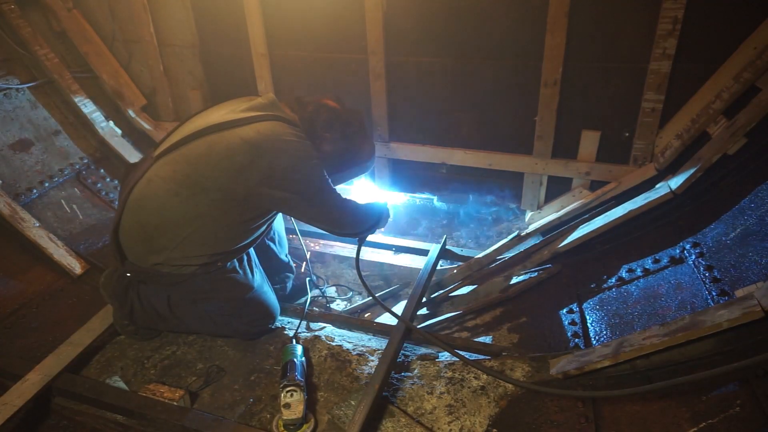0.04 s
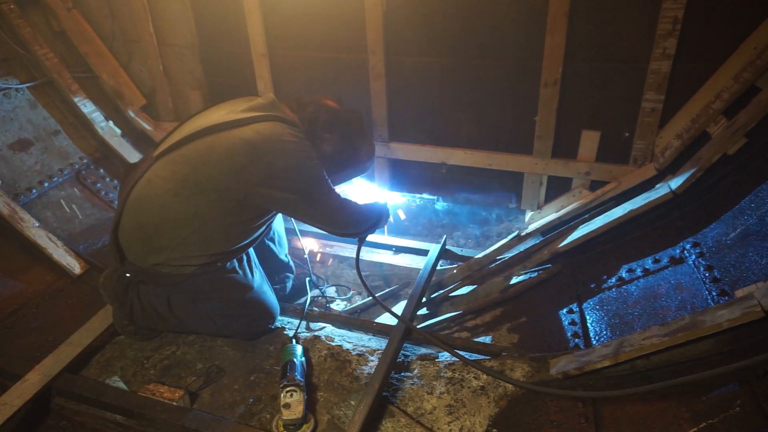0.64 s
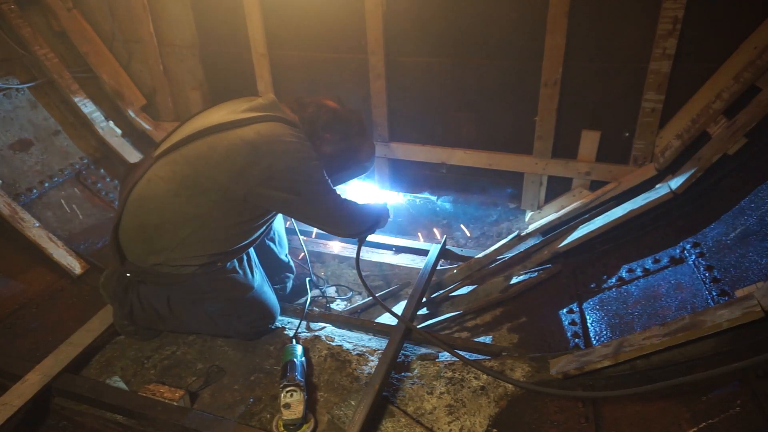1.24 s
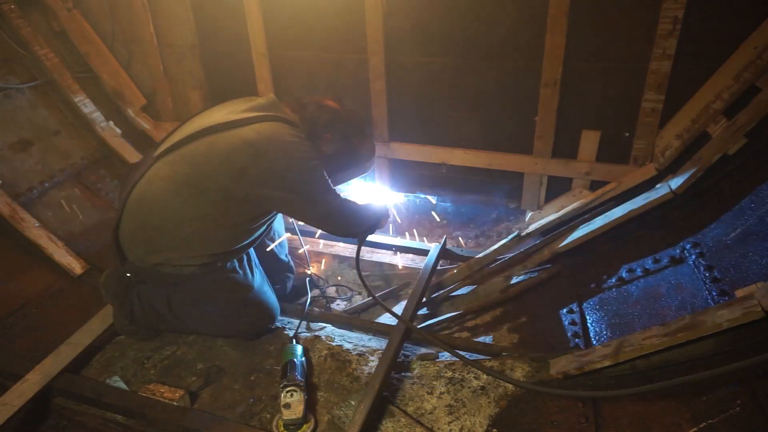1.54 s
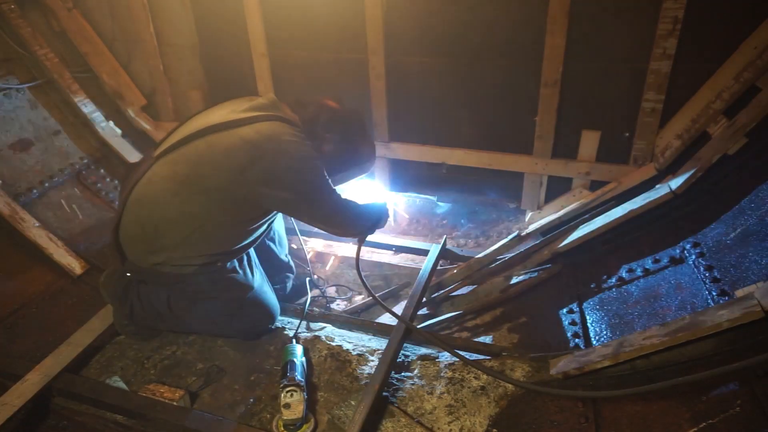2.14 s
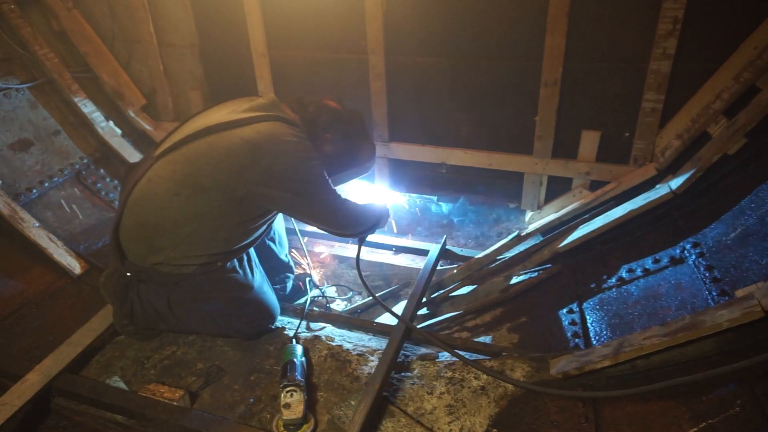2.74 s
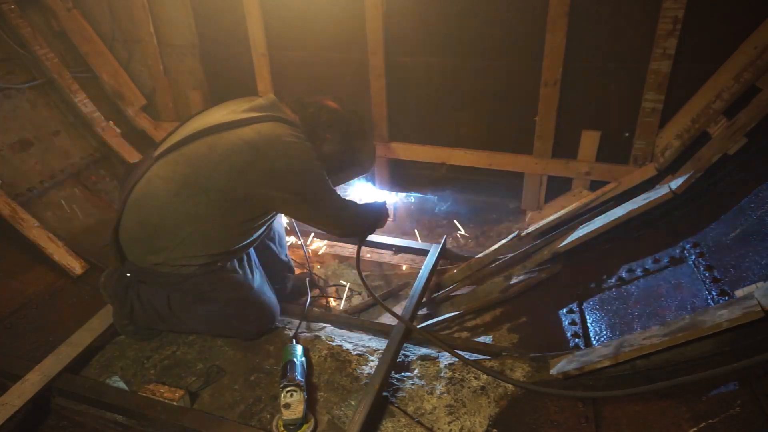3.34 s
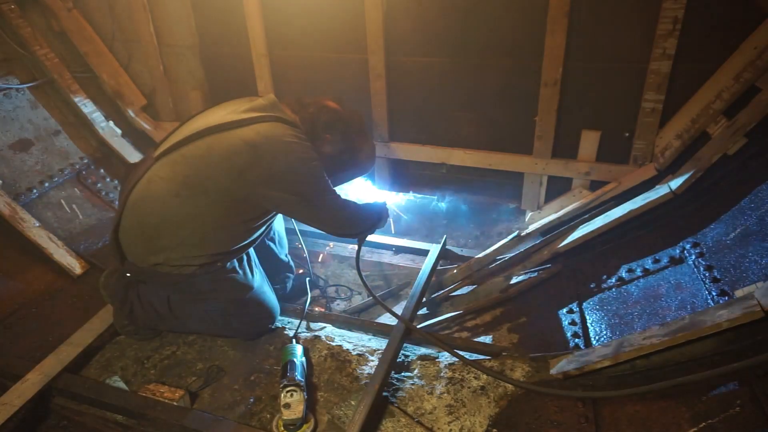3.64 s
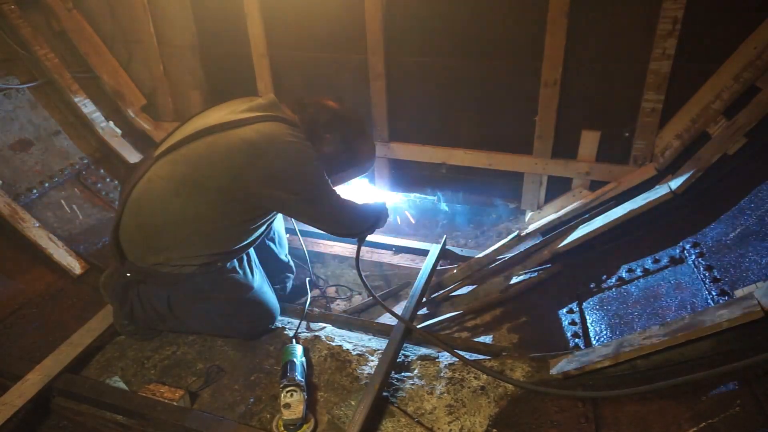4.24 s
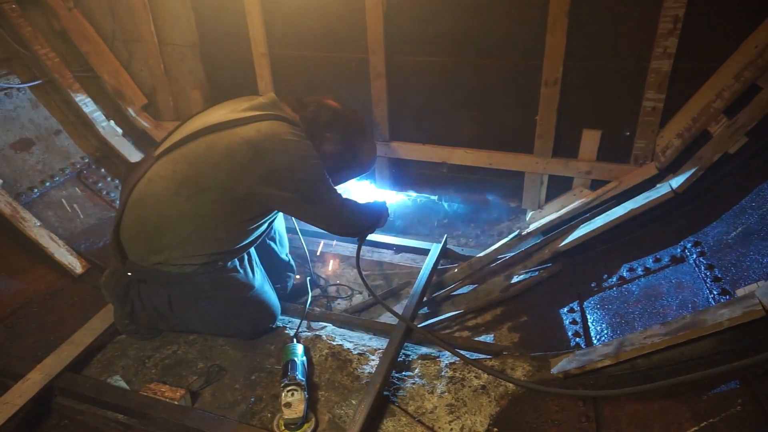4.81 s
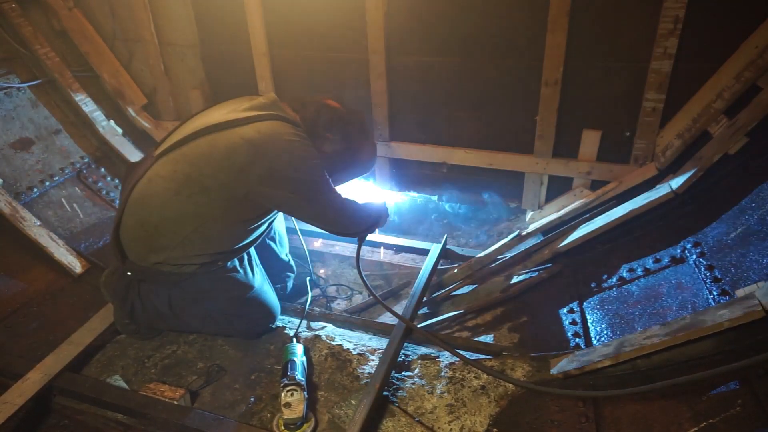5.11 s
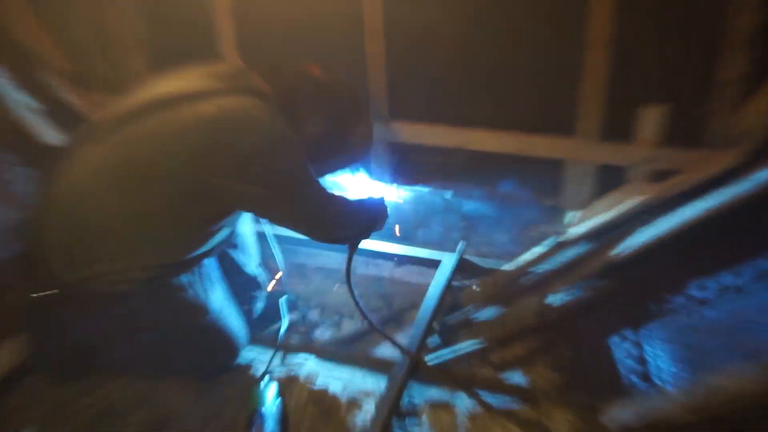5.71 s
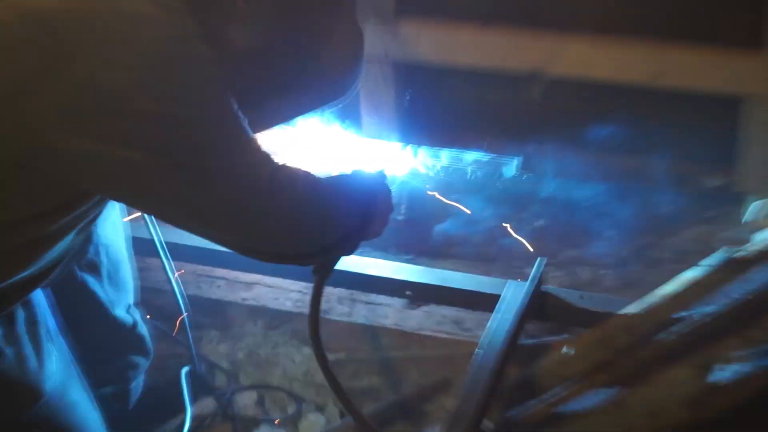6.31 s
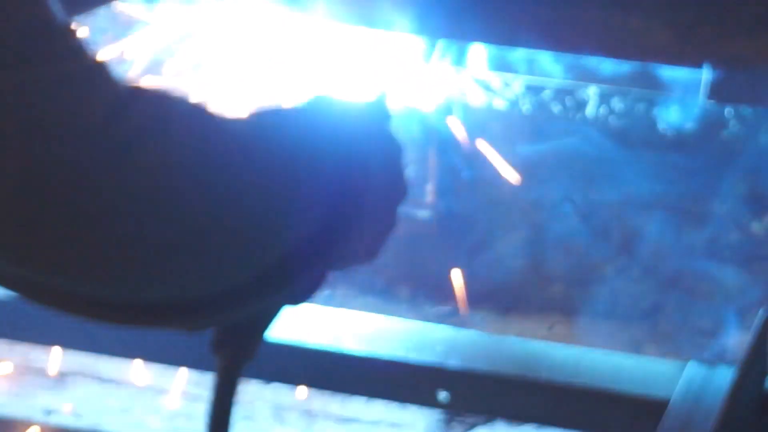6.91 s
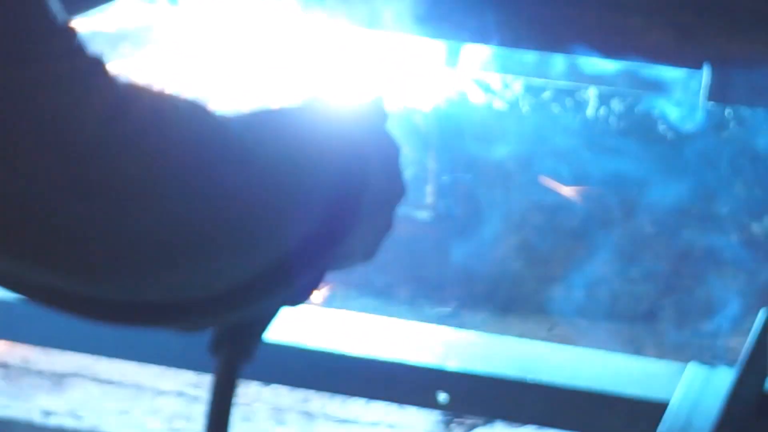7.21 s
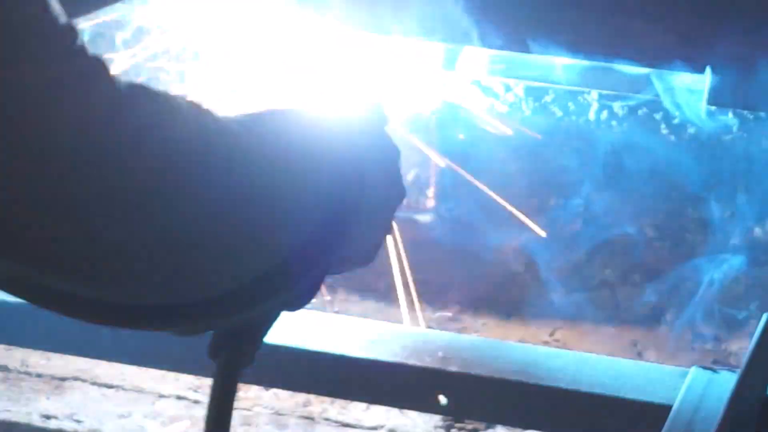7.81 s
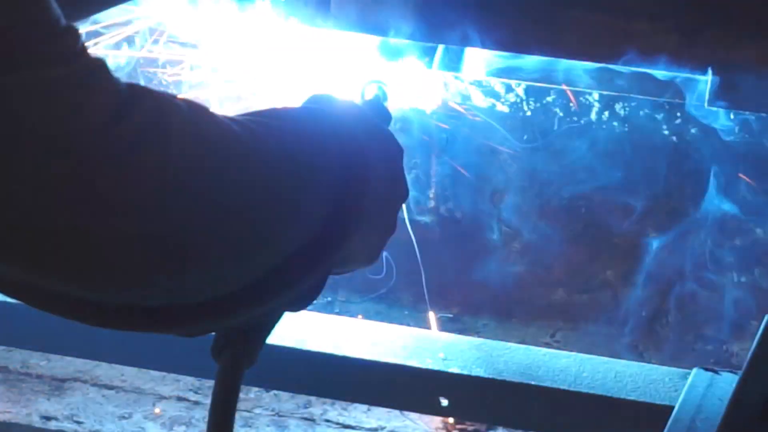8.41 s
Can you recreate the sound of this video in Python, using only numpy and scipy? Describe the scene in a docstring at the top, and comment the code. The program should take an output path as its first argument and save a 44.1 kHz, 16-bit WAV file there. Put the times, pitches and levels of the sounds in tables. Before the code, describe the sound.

Sharp irregular pops and a frying sizzle from arc welding, faltering briefly now and then, with a short metallic hull echo.

```python
"""Arc welding inside a boat hull.

Each metal drop that shorts the arc ends in a sharp pop; between pops the weld pool fries and the
plasma roars. When the arc runs long the popping dies down and a low drone remains. The steel hull,
heard a few metres from the arc, rings with it. Brief air hums and faint bass thumps lie beneath."""
import sys
import numpy as np
from scipy import signal
from scipy.fft import rfft, irfft, next_fast_len
from scipy.io import wavfile
from scipy.ndimage import uniform_filter1d, map_coordinates

SR = 44100
rng = np.random.default_rng(int(sys.argv[2]) if len(sys.argv) > 2 else 0)


def digitize_waveform(pressure):
    """Quantize a signal to 16-bit integers and store it at the path in sys.argv[1].

    Rows of a 2-D input are taken as channels; values are limited to [-1, 1].
    """
    field = np.atleast_2d(pressure).T
    bounded = np.clip(field, -1, 1)
    quanta = np.round(bounded * 32767).astype(np.int16)
    wavfile.write(sys.argv[1], SR, quanta)


N = 377052
FFT_SIZE = next_fast_len(N + SR)
HZ = np.fft.rfftfreq(FFT_SIZE, 1 / SR)
TOP_HZ = 11110

# Big drops and restrikes. Each row: time in seconds, relative level in dB, snap 0-1 (soft to hard).
BIG_DROPS = [(0.0936, -25.5, 0.5), (0.1318, -27, 1), (0.1794, -30, 0.58), (0.233, -27, 0.3),
             (0.2686, -25.5, 0.7), (0.3236, -26, 0.6), (0.3778, -25, 0.7), (0.4246, -26.5, 0.7),
             (0.445, -28, 0.7), (0.4935, -22, 0.6), (0.53, -24, 0.69), (0.5613, -25, 0.5),
             (0.584, -26, 0.52), (0.626, -24.5, 0.35), (0.68, -25.5, 0.7), (0.7014, -22.5, 0.1),
             (0.734, -25.0, 0.65), (0.8516, -23.5, 0.45), (0.9, -23, 0.5), (0.9476, -24, 1),
             (0.974, -25.5, 1), (1.0392, -25.5, 0.8), (1.0955, -26, 0.7), (1.1582, -26.5, 0.5),
             (1.1924, -25.5, 1), (1.24, -28, 0.9), (1.277, -23, 0.8), (1.4206, -27, 0.5),
             (1.436, -24.5, 0.0), (1.4668, -25.5, 0.6), (1.4918, -31, 0.61), (1.5325, -25.5, 0.6),
             (1.562, -24.5, 0.8), (1.6852, -27, 0.6), (1.7258, -25.5, 0.2), (1.889, -29.5, 0.62),
             (1.9184, -22, 0.7), (1.972, -35, 0.6), (2.0279, -22.0, 0.48), (2.0648, -27, 0.82),
             (2.1015, -25, 0.74), (2.1302, -24, 0.36), (2.2084, -26, 1), (2.2436, -25.5, 0.5),
             (2.2714, -28, 0.8), (2.29, -28, 0.9), (2.3088, -25, 0.9), (2.363, -26, 0.73),
             (2.387, -24, 0.8), (2.4226, -26.5, 0.7), (2.4627, -24.5, 0.9), (2.5134, -26.5, 0.63),
             (2.5487, -26.5, 0.84), (2.575, -27, 0.5), (2.634, -26.0, 0.4), (2.6855, -26, 0.63),
             (2.7255, -23.5, 0.56), (2.7658, -24, 0.58), (2.844, -24, 0.23), (2.8865, -27.5, 0.6),
             (2.924, -25.5, 0.7), (2.9763, -26, 0.6), (3.0074, -25.5, 0.6), (3.039, -28, 0.8),
             (3.0689, -27.5, 0.77), (3.093, -25, 0.55), (3.1347, -28, 0.56), (3.299, -24, 0.3),
             (3.484, -30, 0.97), (3.5559, -24.5, 0.7), (3.609, -25.5, 0.78), (3.6823, -25, 0.5),
             (3.741, -27, 0.47), (3.7864, -25, 0.05), (3.818, -25.5, 0.75), (3.9129, -26.0, 0.55),
             (3.959, -25.5, 0.35), (3.9812, -25.5, 0.56), (4.07, -25, 0.49), (4.3423, -26, 0.7),
             (4.4567, -30, 0.01), (4.4917, -22, 0.24), (4.5784, -26.5, 0.8), (4.662, -27, 0.52),
             (4.6977, -24, 0.18), (4.734, -27, 0.3), (4.7771, -24.5, 0.35), (4.797, -25.5, 0.58),
             (4.827, -30.5, 0.5), (4.8723, -26.5, 0.2), (4.9221, -30, 0.46), (4.953, -36, 0.35),
             (4.974, -26.5, 0.48), (4.9888, -26.5, 0.45), (5.0392, -30, 0.6), (5.2263, -26, 0.3),
             (5.3512, -25, 0.75), (5.4297, -30.0, 0.0), (5.4594, -23.5, 0.65), (5.5948, -25, 0.65),
             (5.6253, -26.5, 0.35), (5.6518, -25.5, 0.45), (5.6632, -27, 0.4), (5.6893, -25, 0.4),
             (5.703, -27.5, 0.57), (5.8, -25, 0.3), (5.8826, -23.5, 0.45), (5.918, -29, 0.56),
             (5.977, -26.5, 0.33), (6.0161, -26, 0.67), (6.0674, -22.5, 0.3), (6.1201, -25, 0.3),
             (6.1534, -27, 0.8), (6.1922, -23, 0.35), (6.2299, -27.5, 0.8), (6.2467, -24.5, 0.4),
             (6.324, -26.5, 0.7), (6.401, -26.0, 0.6), (6.4515, -27, 0.44), (6.4825, -26, 0.5),
             (6.5258, -25.5, 0.7), (6.5932, -26, 0.6), (6.6273, -27, 0.83), (6.6766, -32, 0.55),
             (6.704, -26, 0.6), (6.7428, -24, 0.47), (6.7984, -23, 0.6), (6.82, -25.5, 0.4),
             (6.8651, -27, 0.4), (6.917, -23.5, 0.55), (6.9405, -22.5, 0.65), (7.015, -28, 0.51),
             (7.0463, -31, 0.58), (7.0695, -27.5, 0.55), (7.0985, -27.5, 0.53), (7.124, -27.5, 0.4),
             (7.143, -32, 0.6), (7.2043, -31, 0.3), (7.285, -33, 0.2), (7.324, -29.5, 0.2),
             (7.572, -35, 0.3), (7.6068, -20.5, 0.5), (7.696, -39, 0.5), (7.704, -21.5, 1),
             (7.839, -35, 0.85), (7.855, -27.5, 0.74), (7.9192, -24, 0.74), (7.9742, -21.5, 0.52),
             (8.0437, -23, 0.86), (8.2152, -24.0, 0.4), (8.2539, -24, 1), (8.2862, -26, 0.9),
             (8.3097, -24, 0.8), (8.346, -32, 0.9), (8.3717, -28, 0.98), (8.3997, -25.5, 0.9),
             (8.451, -19.5, 0.64), (8.484, -34, 0.96)]


def pops(room, drops, gain_db=31, max_snap_share=.89, rise_s=.0083, spit_t60_s=.028, soft_extra_s=.016):
    """The molten bridge bursts: part in one pressure spike, the rest in a ragged spit."""
    # Each row: frequency in Hz, gain in dB.
    pop_tone = [(40, 0), (120, -3), (300, -9), (1000, -7), (2200, -7.5), (3700, -2.5), (6000, -.5),
                (9500, 1.5)]
    count = SR // 12
    t = np.arange(count) / SR
    pressure = np.zeros(N + count)
    crackles = rng.laplace(size=(SR // 100, count))
    for (start_s, db, snap), crackle in zip(drops, crackles):
        spike_share = np.clip(snap * max_snap_share, 0, 1)
        softness = (1 - spike_share) ** 2  # soft bursts rise slower and last longer
        swell = 1 - np.exp(-t / (softness * rise_s + 1 / SR))
        fade = amp(-60 * t / (spit_t60_s + softness * soft_extra_s))
        burst = np.sqrt((1 - spike_share) / count) * unit(crackle * swell * fade)
        burst[0] += np.sqrt(spike_share)
        pressure[round(start_s * SR):][:count] += amp(db + gain_db) * burst
    return through(pressure, room, pop_tone)


def small_drops(dip_db, gain_db=-4.5, gap_spread=.33, spread_db=.4, snap_spread=.1):
    """Steady wire feed puts small drops between the big ones, weaker in a lull. Rows as BIG_DROPS."""
    # Steady welding. Each row: start and end in seconds, drops per second, relative level in dB, snap.
    beads = [(.02, 1.301, 40, -27, 1), (1.432, 1.729, 33, -27.5, 0.3), (1.916, 2.726, 40.5, -28, 0.9),
             (2.726, 3.135, 25, -27, 0.7), (3.51, 4.21, 24, -25, 0.5), (4.429, 5.1, 32.5, -31, 0.2),
             (5.588, 6.5, 30, -27.5, 0.9), (6.5, 7.161, 36, -28, 0.29), (7.855, 8.043, 42, -27, 0.4),
             (8.18, 8.51, 37, -28, 0.9)]
    drops = []
    for start_s, end_s, per_s, db, snap in beads:
        marks_s = [start_s] + [s for s, _, _ in BIG_DROPS if start_s < s < end_s] + [end_s]
        draws = rng.standard_normal((SR // 2000, SR // 1000, 3))
        for from_s, to_s, draw in zip(marks_s, marks_s[1:], draws):
            count = max(round((to_s - from_s) * per_s), 1)
            gap, size, hardness = np.clip(draw[:count], -2, 1).T
            elapsed = np.cumsum(np.exp(gap_spread * gap))
            times_s = from_s + (to_s - from_s) * elapsed[:-1] / elapsed[-1]
            for s, extra_db, extra_snap in zip(times_s, spread_db * size, snap_spread * hardness):
                lull_db = dip_db[min(round(s * SR), N - 1)]
                drops.append((s, db + gain_db + extra_db + lull_db, snap + extra_snap))
    return drops


def spatter(room, level_db, gain_db=1, bursts_per_s=1500, spread_db=5.5, flutter_db=.5):
    """The weld pool fries: tiny bursts of unequal size."""
    # Each row: frequency in Hz, gain in dB.
    spatter_tone = [(40, -20), (300, -10.5), (1000, -8.5), (2200, -7.5), (4000, -6.5), (6000, -2),
                    (10000, -4.5)]
    sizes = amp(spread_db * np.clip(rng.standard_normal(N), -2, 2)) * rng.choice([-1, 1], N)
    sparks = unit((rng.random(N) < bursts_per_s / SR) * sizes)
    return through(sparks * amp(level_db + gain_db + flutter_db * wobble(60)), room, spatter_tone)


def plasma(room, roar_db, roar_gain_db=-2, flutter_db=2.5, surge_db=.7, wander_db=1.4):
    """Unsteady plasma roars and keeps the low hull resonances droning."""
    # Each row: frequency in Hz, gain in dB.
    roar_tone = [(40, -1), (150, 2.5), (350, -4), (600, 1.5), (1200, -2.5), (2100, 0), (2900, -5),
                 (4500, -11), (10000, -21)]
    drone_tone = [(40, -44.5), (150, 2.5), (290, -3.5), (400, -2.5), (600, -7), (1000, -14.5), (4000, -48)]
    # Each row: time in seconds, level in dB.
    drone_levels = [(0.0, -38), (0.09, -52), (2.66, -45.5), (2.71, -55), (5.48, -47), (5.64, -44),
                    (5.71, -46.5), (7.31, -52.5), (7.33, -47), (8.55, -46.5)]
    drone_db, = curves(drone_levels)
    turbulence = rng.standard_normal(N) * amp(flutter_db * wobble(40))
    roar = unit(through(turbulence, room, roar_tone))
    drone = unit(through(rng.standard_normal(N), room, drone_tone))
    roar *= amp(roar_db + roar_gain_db + surge_db * wobble(9))
    drone *= amp(drone_db + wander_db * wobble(9))
    return roar + drone


def lulls(fade_s=.0091, restrike_s=.004):
    """The arc runs long or nearly dies, then restrikes: spatter and roar changes in dB."""
    # Each row: start and end in seconds, spatter change in dB, roar change in dB.
    long_arcs = [(1.309, 1.423, -16.5, 1.5), (1.76, 1.877, -24, -4), (3.15, 3.278, -8.5, 8),
                 (3.313, 3.432, -3.5, -9), (4.22, 4.324, -13.5, -1.5), (4.342, 4.437, -6.5, 9),
                 (5.087, 5.212, -7, -18), (5.257, 5.341, -34, -6), (5.374, 5.426, -16, -1.5),
                 (5.502, 5.59, -12, -3.5), (5.716, 5.777, -6, 2), (6.26, 6.325, -7.5, 0.5),
                 (6.342, 6.453, -5.5, 0), (7.168, 7.281, -30, -7), (7.298, 7.32, -9, -6),
                 (7.34, 7.478, -11.5, -0.5), (7.357, 7.437, -20, -3.5), (7.387, 7.482, 2, -11),
                 (7.502, 7.594, -9.5, -2.5), (7.642, 7.7, -22, -1.5), (7.735, 7.85, -27, -7.5),
                 (8.06, 8.174, -4, -1.5), (8.495, 8.59, -26, 3)]
    t = np.arange(N) / SR
    change_db = np.zeros((2, N))
    for start_s, end_s, spatter_db, roar_db in long_arcs:
        depth = np.clip((t - start_s) / fade_s, 0, 1) * np.clip((end_s - t) / restrike_s + 1, 0, 1)
        change_db += np.outer([spatter_db, roar_db], depth)
    return change_db


def air_hums(waver_rad=.3):
    """Air resonances in the hull swell and fade, slightly unsteady in pitch."""
    # Each row: peak time in seconds, frequency in Hz, level in dB, half-length in seconds.
    hums = [(1.343, 390, -43.5, .05), (1.831, 386, -45.5, 0.041), (1.839, 596, -43, 0.035),
            (4.302, 290, -54, 0.26), (4.412, 369, -44.5, 0.053), (5.312, 594, -44, 0.044),
            (5.328, 414, -45, 0.048), (5.627, 293, -39.5, 0.065), (5.757, 298, -46, 0.038),
            (6.351, 367, -45, 0.11), (7.393, 371, -43, 0.066), (7.686, 372.4, -44, 0.1),
            (7.83, 299, -49, 0.12), (8.033, 366, -46, 0.054), (8.214, 374, -44, 0.063)]
    count = SR * 2 // 3
    t = (np.arange(count) - count // 2) / SR
    sound = np.zeros(N + count)
    for peak_s, hz, db, half_s in hums:
        drift = np.interp(t, np.linspace(t[0], t[-1], num=20), rng.standard_normal(20))
        hum = np.exp(-(t / half_s) ** 2) * np.sin(2 * np.pi * hz * t + waver_rad * drift)
        sound[round(peak_s * SR) - count // 2:][:count] += amp(db) * hum
    return sound[:N]


def rumble(roar_db, thumps_per_s=5.5, half_s=.019, faint_db=-73, floor_db=-92, side_db=-5):
    """Soft, irregular bass thumps over a flickering floor; the faint ones grow with the roar."""
    # Each row: frequency in Hz, gain in dB.
    rumble_tone = [(20, -11), (40, -6), (70, -5), (120, -5), (180, -5), (260, -24), (600, -75)]
    # Each row: peak time in seconds, level in dB.
    strong_thumps = [(0.15, -55), (0.25, -59), (0.41, -64), (0.49, -66), (0.68, -62), (0.91, -61),
                     (1.08, -66), (1.28, -60), (1.72, -63), (1.91, -62), (2.04, -63), (2.13, -63),
                     (2.37, -58), (2.53, -61), (2.66, -57), (3.3, -65), (3.89, -61), (4.07, -68),
                     (4.16, -64), (4.78, -69), (4.97, -61), (5.35, -65), (5.45, -63), (5.62, -53),
                     (5.69, -60), (6.01, -62), (6.12, -62), (6.42, -65), (6.59, -62), (6.91, -61),
                     (7.09, -66), (7.69, -62), (7.91, -56), (8.23, -54), (8.45, -59.5)]
    t = np.arange(N) / SR
    coarse_t = t[::100]

    def swells(thumps):
        envelope = sum(amp(db) * np.exp(-((coarse_t - s) / half_s) ** 2) for s, db in thumps)
        return np.interp(t, coarse_t, envelope)

    mid, side = through(rng.standard_normal((2, N)), 1, rumble_tone) * amp([[0], [side_db]])
    faint_thumps = [((k + .35 * late) / thumps_per_s, faint_db + 3 * size)
                    for k, (late, size) in enumerate(rng.standard_normal((SR // 500, 2)))]
    floor = amp(floor_db + 5 * wobble(11))
    roar_gain = amp(.15 * (roar_db - np.median(roar_db)))
    level = floor + swells(strong_thumps) + swells(faint_thumps) * roar_gain
    return unit(np.array([mid + side, mid - side])) * level


def hull(direct_db=-7, scatter_db=-1.5, scatter_t60_s=.067, tail_db=-1, build_s=.002):
    """Stereo frequency response of the hull: direct sound, steel reflections, long ring."""
    # Broad colour. Each row: frequency in Hz, relative gain in dB.
    colour = [(20, -84), (70, -53), (150, -38.5), (195, -32.5), (230, -25), (330, -19.5), (650, -14),
              (900, -12), (2400, -11), (4000, -11.5), (6000, -11), (7000, -14), (8500, -12), (9700, -9),
              (11000, -11.5)]
    # Plate, frame and air resonances, and hollows. Each row: centre in Hz, width in Hz, lift in dB.
    modes = [(298, 17, 9.6), (375, 34, 6.4), (422, 104, 4.0), (530, 14, 4.6), (720, 50, -2), (827, 14, 5.2),
             (881, 25, 8.0), (930, 48, 3.4), (1010, 86, 5.0), (1112, 38, 8.2), (1176, 37, 4.7),
             (1267, 19, 10.8), (1325, 40, -3), (1401, 34, 7.6), (1517, 110, 6.5), (1600, 15, 4.1),
             (1690, 70, 3), (1913, 27, 4.6), (1980, 38, 8.6), (2075, 100, 5.2), (2340, 220, -2.2),
             (2614, 60, 7.0), (2748, 32, 6.0), (2932, 57, 4.7), (3116, 45, 7.2), (3273, 28, 6.0),
             (3335, 36, 4.4), (3722, 59, 4.8), (3780, 80, 6.2), (3960, 90, 6.8), (4070, 20, 6.2),
             (4304, 21, 6.0), (4545, 37, 7.1), (4828, 18, 7.0), (4890, 15, 5.2), (5421, 56, 5.0),
             (5745, 50, 3), (5872, 72, 4.4), (6024, 17, 5.9), (6186, 55, 4.2), (6355, 35, 3.5),
             (6510, 27, 5.6), (6750, 160, -2.5), (8050, 110, 5.0), (8377, 82, 5.0), (8744, 51, 8.2),
             (8808, 36, 6.0), (9253, 35, 7.0), (9499, 31, 3.8), (9610, 50, 3)]
    # Steel surfaces. Each row: delay in seconds, level in dB re direct sound.
    walls = [(.0006, -16.5), (.001, -5), (.0026, -7), (.0031, -6), (.0035, -13), (.0047, -12.5),
             (.0057, -7.5), (.031, -7), (.0326, -11.5)]
    # Each row: frequency in Hz, reverberation T60 in seconds.
    decay = [(300, .6), (1000, .55), (2500, .4), (5000, .31), (10000, .26)]
    # Each row: frequency in Hz, side level in dB re mid.
    stereo_width = [(60, -38), (280, -14), (500, -8.5), (1000, -6), (2000, -3.5), (5000, -1), (10000, -3.5)]
    # Each row: frequency in Hz, share of echo ripple kept 0-1.
    echo_ripple = [(250, .1), (4000, .25), (6500, .5)]
    count = SR * 3 // 4
    t = np.arange(count) / SR
    hz, frame_s, spectra = signal.stft(rng.standard_normal((2, count)), SR, nperseg=256)
    spectra *= amp(-60 * frame_s / along(decay, hz)[:, None])
    tail = signal.istft(spectra, SR, nperseg=256)[1][:, :count]
    tail *= 1 - np.exp(-t / build_s)
    scatter = rng.standard_normal((2, count)) * amp(-60 * t / scatter_t60_s)
    echoes = (amp(tail_db) * unit(tail) + amp(scatter_db) * unit(scatter)) / np.sqrt(2 * count)
    for k, (delay_s, db) in enumerate(walls):
        mid_side = np.array([1, (-1) ** k / 2])  # left and right in turn
        echoes[:, round(delay_s * SR)] += amp(direct_db + db) * mid_side
    echoes[0, 0] += amp(direct_db)  # arc straight ahead
    paths = rfft(echoes, FFT_SIZE)
    # Echoes give the fine ripple; colour and modes set the broad shape.
    power = np.abs(paths) ** 2
    ripple = along(echo_ripple, HZ)
    smooth = np.abs(uniform_filter1d(power, size=2400))
    fine = np.abs(uniform_filter1d(power, size=200))
    trend = np.sqrt(smooth ** ripple * fine ** (1 - ripple))
    lift_db = sum(db / (1 + (2 * (HZ - centre_hz) / width_hz) ** 2) for centre_hz, width_hz, db in modes)
    shape = amp(along(colour, HZ) + lift_db)
    shape /= np.sqrt(np.mean(shape ** 2 * (HZ < TOP_HZ)))
    width = amp(along(stereo_width, HZ))
    mid = paths[0] * causal(shape / trend[0] / np.hypot(1, width))
    side = paths[1] * causal(shape / trend[1] * width / np.hypot(1, width))
    return np.array([mid + side, mid - side])


def amp(db):
    """Decibels to gain."""
    return 10 ** (np.asarray(db) / 20)


def unit(x):
    """Scale to rms 1."""
    return x / np.sqrt(np.mean(x ** 2) + 1e-20)


def along(points, hz):
    """Interpolate (Hz, value) points on a log axis."""
    knots_hz, values = np.transpose(points)
    return np.interp(np.log(hz + 1), np.log(knots_hz + 1), values)


def curves(rows):
    """One value per sample for each column after the time."""
    times_s, *columns = np.transpose(rows)
    return [np.interp(np.arange(N) / SR, times_s, column) for column in columns]


def wobble(knots_per_s):
    """Smooth random curve."""
    knots = rng.standard_normal(int(N * knots_per_s / SR) + 4)
    return map_coordinates(knots, [np.arange(N) * knots_per_s / SR])


def causal(gain):
    """Minimum-phase response with this gain: no ringing ahead of a blow."""
    cepstrum = irfft(np.log(np.maximum(gain, 1e-6)), FFT_SIZE)
    cepstrum[1:FFT_SIZE // 2] *= 2
    cepstrum[FFT_SIZE // 2 + 1:] = 0
    return np.exp(rfft(cepstrum))


def through(x, response, tone):
    """Filter a source by its tone and a stereo response."""
    return irfft(rfft(x, FFT_SIZE) * response * causal(amp(along(tone, HZ))), FFT_SIZE)[:, :N]


def scene():
    """The arc in the hull, slightly louder on the right, over hums and rumble."""
    # Arc strength. Each row: time in seconds, relative spatter and roar levels in dB.
    arc_levels = [(0, -22, -47.5), (.7, -29, -31.5), (1.05, -24.5, -48), (1.24, -23.5, -31),
                  (1.48, -24.5, -46), (1.68, -26, -32.5), (2.12, -25.5, -55), (2.4, -25, -32),
                  (2.8, -28.5, -44.5), (3.4, -30.5, -61), (3.7, -25, -48), (4, -34.5, -33),
                  (4.15, -27.5, -42), (4.4, -23, -46.5), (4.72, -29.5, -37.5), (5.3, -28.5, -33),
                  (5.7, -31, -38.5), (6.18, -24.5, -33.5), (6.45, -26.5, -37.5), (6.75, -24, -33),
                  (7.1, -24.5, -31), (7.55, -29, -34.5), (8, -25.5, -36), (8.5, -22.5, -36)]
    room = hull()
    lull_db = lulls()
    spatter_db, roar_db = curves(arc_levels) + lull_db
    drops = BIG_DROPS + small_drops(lull_db[0])
    arc = pops(room, drops) + spatter(room, spatter_db) + plasma(room, roar_db)
    balance = amp([[-.85], [.85]])
    return arc * balance + air_hums() + rumble(roar_db)


def record(dry):
    """Steep low-pass at TOP_HZ."""
    low_pass = 1 / np.sqrt(1 + (HZ / TOP_HZ) ** 400)
    return irfft(rfft(dry, FFT_SIZE) * low_pass, FFT_SIZE)[:, :N]


dry = scene()
out = record(dry)
digitize_waveform(out)
```